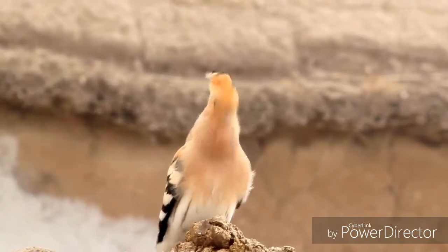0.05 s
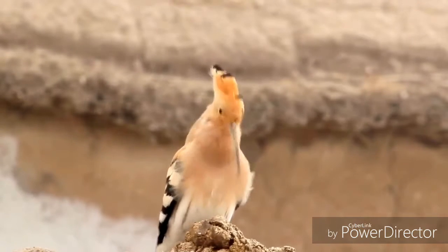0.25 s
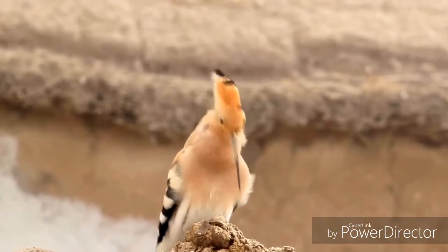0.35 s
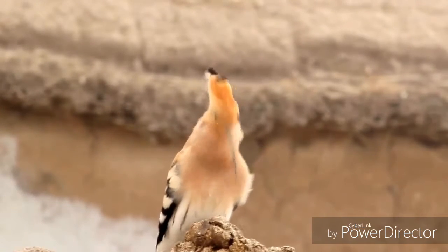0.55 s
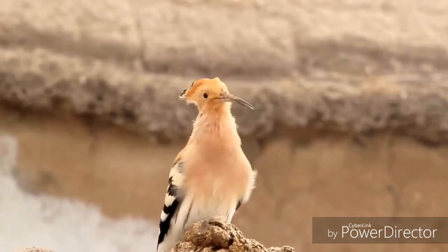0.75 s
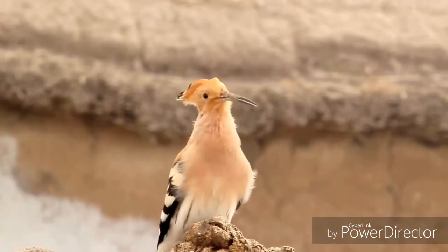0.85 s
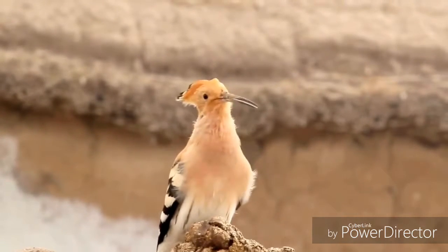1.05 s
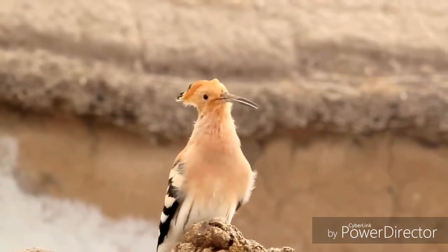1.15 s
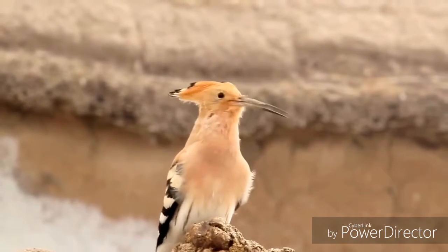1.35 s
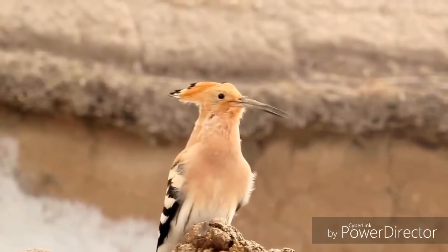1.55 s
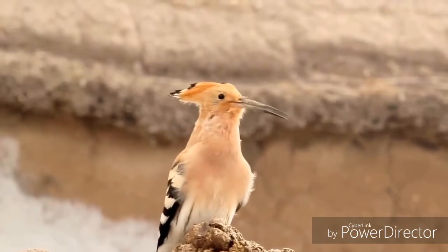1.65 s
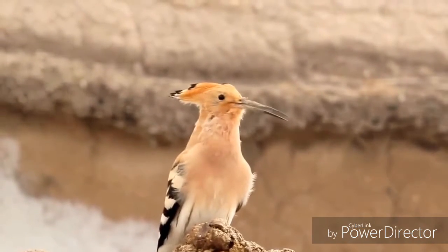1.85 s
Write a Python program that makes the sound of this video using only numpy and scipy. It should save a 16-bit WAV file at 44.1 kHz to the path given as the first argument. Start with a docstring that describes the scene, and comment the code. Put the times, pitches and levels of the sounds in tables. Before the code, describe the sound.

A hoopoe gives three soft, low, evenly spaced hoots, with a brief wooden knock just after the first begins. Nearby sparrows chirp throughout and carry on afterward, over distant twittering and faint outdoor air, with a slight echo off walls.

```python
"""Sparrows chirp over a steady wash of outdoor air, soft puffs of hiss and distant twitter.
A hoopoe on a rock hoots three soft, nearly pure notes from its inflated throat, and nearby
walls throw them back. Something wooden is knocked and rings briefly. Other birds whistle,
call thinly or caw, their voices fluttering into a rasp, and a far one holds a thin note."""
import sys
import numpy as np
from scipy import signal
from scipy.io import wavfile
from scipy.ndimage import uniform_filter1d

SR = 44100
rng = np.random.default_rng(int(sys.argv[2]) if len(sys.argv) > 2 else 0)


def dump(signal):
    """Clip the signal to [-1, 1] and save it as 16-bit WAV at the path in sys.argv[1]."""
    limited = np.clip(np.atleast_2d(signal).T, -1, 1)
    pcm = np.round(limited * 32767).astype(np.int16)
    wavfile.write(sys.argv[1], SR, pcm)


N = 83790

# Slapback of the birds off the walls. Each row: delay in seconds, relative level in dB.
WALL_ECHOES = [(.036, -18.4), (.0573, -24.8), (.0608, -19.3), (.1075, -24.5), (.1172, -29.5),
               (.1574, -28.7), (.2, -32.2), (.2228, -33.5)]


def amp(db):
    return 10 ** (np.asarray(db) / 20)


def unit_rms(x):
    return x / np.sqrt(np.mean(abs(x) ** 2) + 1e-20)


def curve_at(points, hz):
    """Read a curve of (Hz, value) points along a log frequency axis."""
    point_hz, value = np.transpose(points)
    return np.interp(np.log(hz + 1), np.log(point_hz + 1), value)


def add(mix, start_s, sound):
    part = mix[round(start_s * SR):][:len(sound)]
    part += sound[:len(part)]


def drift(n, hz):
    """Complex noise that wanders more slowly than hz, at rms 1."""
    pole, settle = np.exp(-2 * np.pi * hz / SR), 4000
    noise = rng.standard_normal(n + settle) + 1j * rng.standard_normal(n + settle)
    return unit_rms(signal.lfilter([1], [1, -2 * pole, pole * pole], noise)[settle:])


def air_wash():
    """A bed of outdoor noise with soft patches and a wavering hum; the bass slowly ebbs and swells."""
    # Colour of the air. Each row: frequency in Hz, relative level in dB.
    spectrum = [(24, -52), (40, -20.5), (80, -9), (150, 0.5), (280, 2), (520, -1), (1200, -2), (2430, -3),
                (3280, -2), (4210, -6), (4880, -7), (6920, -12.5), (10000, -18.5), (15400, -26)]
    # Low hums. Each row: pitch in Hz, level in dB, waver rate in Hz.
    hums = [(43.4, -83, 5), (89.7, -74.5, 2.1), (146.6, -68, 9)]
    # Fader ride on the bass and the hums. Each row: time in seconds, gain in dB.
    bass_ride = [(0, 2.5), (.45, 3.5), (.9, -6), (1.4, 0), (1.9, -6.5)]
    wash_db, patch_db, bass_hz = -56.5, 1.8, 130
    ride_s, ride_db = np.transpose(bass_ride)
    frames, hz, t = N // 256 + 5, np.fft.rfftfreq(1024, 1 / SR)[:, None], np.arange(N) / SR
    real, imag, patches = rng.standard_normal((frames, 513, 3)).T
    patches = unit_rms(uniform_filter1d(uniform_filter1d(patches, 12, axis=0), 10, axis=1))
    bass_db = np.interp(np.arange(frames) * 256 / SR, ride_s, ride_db) / (1 + (hz / bass_hz) ** 4)
    bands = (real + 1j * imag) * amp(curve_at(spectrum, hz) + patch_db * patches + bass_db)
    air = signal.istft(bands, nperseg=1024, noverlap=768)[1][:N]
    hum = sum(amp(db) * ((1 + .42 * drift(N, waver_hz)) * np.exp(2j * np.pi * pitch * t)).real
              for pitch, db, waver_hz in hums)
    return amp(wash_db) * unit_rms(air) + hum * amp(np.interp(t, ride_s, ride_db))


def hiss_puffs():
    """Short, soft swells of band-limited hiss."""
    # Each row: start and length in seconds, low and high edge in Hz, level at the crest in dB.
    puffs = [(0, 0.045, 1460, 2580, -54), (0.182, 0.061, 5500, 9300, -63), (0.392, .05, 2000, 5200, -54),
             (0.448, 0.044, 2170, 5100, -53.5), (1.704, 0.11, 4840, 7800, -60)]
    out = np.zeros(N)
    for start, length, low_hz, high_hz, db in puffs:
        n = round(length * SR)
        band = signal.butter(2, [low_hz, high_hz], "band", fs=SR, output="sos")
        hiss = unit_rms(signal.sosfilt(band, rng.standard_normal(n)))
        add(out, start, amp(db) * hiss * np.sqrt(np.hanning(n)))
    return out


def wood_knocks():
    """Struck wood rings in fast-dying modes, with no deep bass, and echoes off the walls."""
    # Each row: start in seconds, gain in dB. The first lands just before the scene; its echoes carry in.
    knocks = [(-.045, -24), (0.262, -16), (1.339, -40)]
    # Modes of the wood. Each row: frequency in Hz, relative level in dB, time to fall 60 dB in seconds.
    modes = [(1127, 5.5, 0.0095), (1628, -0.5, 0.011), (836, -9.5, 0.052), (1068, -12, 0.038),
             (1697, -20, 0.055), (1460, -16, 0.049), (450, -16, 0.036), (347, -21, 0.033)]
    # The knocks echo from another side. Each row: delay in seconds, relative level in dB.
    echoes = [(.032, -23), (.038, -22), (.044, -19), (.052, -16), (.061, -22), (.068, -21), (.075, -22),
              (.09, -26)]
    lead_s, attack_s = .1, .0018
    t, out = np.arange(6000) / SR, np.zeros(N + round(lead_s * SR))
    ring = sum(amp(db - 60 * t / t60) * np.sin(2 * np.pi * hz * t) for hz, db, t60 in modes)
    attack = np.sin(np.pi / 2 * np.minimum(t / attack_s, 1)) ** 2
    blow = signal.sosfilt(signal.butter(2, 230, "high", fs=SR, output="sos"), ring * attack)
    for start, db in knocks:
        add(out, start + lead_s, amp(db) * blow)
    return walls(out, echoes, echo_db=0, tail_db=-10.5, rise_s=.032)[-N:]


def bird_voice(contour, harmonics_db, rasp):
    """One call on a pitch and level contour; rasp (0-1) breaks it up into sidebands and hiss."""
    flutter_hz, breakup_hz, hiss_hz, fade_s = 338.5, 117, 470, .003
    times, hz, db = np.transpose(contour)
    t = np.arange(times[0], times[-1], 1 / SR)
    n = len(t)
    phase = 2 * np.pi * np.cumsum(uniform_filter1d(np.interp(t, times, hz), 60)) / SR
    fade = np.clip(np.minimum(t - times[0], times[-1] - t) / fade_s, 0, 1)
    flutter_rate = flutter_hz * (1 + .241 * drift(n, 74).real)
    beat = 2 * np.pi * (np.cumsum(flutter_rate) / SR + rng.random())
    depth = (1 + abs(drift(n, breakup_hz))) / 2
    sidebands = depth * (np.exp(1j * beat) + .81 * np.exp(-1j * beat))
    tone, out = np.zeros(n), np.zeros(N)
    for k, harmonic_db in enumerate(harmonics_db, 1):
        roughness = .3 * drift(n, breakup_hz) + .7 * sidebands + .45 * drift(n, hiss_hz)
        flutter = 1 - rasp / 2 + rasp * roughness
        tone += amp(harmonic_db) * (flutter * np.exp(1j * k * phase)).real
    add(out, times[0], np.sqrt(2) * fade * amp(np.interp(t, times, db)) * tone)
    return out


def thin_calls():
    """High, raspy slivers of song with no overtones."""
    # One contour a call. Each row: time in seconds, pitch in Hz, level in dB.
    calls = [
        [(0.008, 4000, -38), (0.014, 4700, -62), (0.018, 5270, -59), (0.026, 4930, -57), (0.035, 4760, -50)],
        [(0.382, 6400, -65), (0.388, 6360, -54), (0.394, 6460, -58)],
        [(0.424, 6560, -65), (0.429, 6450, -63), (0.435, 6400, -71)],
        [(0.469, 6200, -74), (0.475, 6050, -65), (0.48, 6200, -73)],
        [(0.538, 6100, -68), (0.544, 7000, -61.5), (0.549, 7700, -61)],
        [(0.64, 5000, -50), (0.644, 5120, -80), (0.652, 6070, -62), (0.658, 5800, -61), (0.668, 5640, -77)],
        [(0.738, 6057, -79), (0.744, 5960, -61), (0.766, 5840, -71), (0.775, 5730, -74)],
        [(0.843, 5630, -77), (0.855, 5860, -73), (0.861, 5780, -61), (0.872, 5660, -62)],
        [(1.035, 4000, -76), (1.049, 4150, -76), (1.071, 4040, -74), (1.075, 4000, -70)],
        [(1.112, 6100, -72), (1.12, 6530, -65), (1.128, 7340, -67), (1.136, 7700, -76)],
        [(1.588, 4760, -54), (1.596, 5560, -57), (1.6, 5730, -58.5), (1.606, 7600, -52.5), (1.61, 7600, -89)],
        [(1.652, 5360, -76), (1.67, 8400, -66), (1.688, 8650, -65), (1.7, 8669, -78), (1.708, 8000, -79)],
    ]
    return sum(bird_voice(call, [0], rasp=.6) for call in calls)


def sparrow_chirps():
    """Close sparrows: fast, jagged pitch sweeps with a faint octave on top."""
    # One contour a chirp. Each row: time in seconds, pitch in Hz, level in dB.
    chirps = [
        [(0.024, 3130, -53), (0.034, 3590, -53), (0.04, 3704, -48), (0.046, 3565, -55), (0.051, 3480, -39),
         (0.056, 3680, -63), (0.06, 3550, -37), (0.064, 2916, -55), (0.07, 2974, -58), (0.083, 3646, -41),
         (0.09, 3570, -51), (0.096, 3080, -46), (0.102, 3130, -45), (0.11, 2900, -57), (0.116, 2800, -63),
         (0.12, 2818, -73)],
        [(0.214, 3690, -55), (0.216, 3810, -46.5), (0.224, 4490, -42.5), (0.226, 4750, -40.5),
         (0.232, 4410, -49), (0.24, 3950, -33), (0.244, 3710, -52), (0.25, 3060, -45), (0.252, 4160, -60)],
        [(0.253, 4770, -48), (0.265, 4030, -45), (0.273, 4000, -56), (0.275, 3640, -78)],
        [(0.277, 2670, -43), (0.283, 2940, -44), (0.291, 3167, -45.5), (0.301, 3027, -43.5),
         (0.311, 2876, -44.5), (0.316, 2600, -37), (0.322, 2400, -44)],
        [(0.545, 4180, -74), (0.549, 5050, -56), (0.553, 5907, -47.5), (0.557, 5700, -44), (0.561, 6375, -51),
         (0.567, 5057, -45), (0.571, 4460, -37.5), (0.579, 4645, -39.5), (0.585, 4115, -37), (0.591, 3467, -40),
         (0.596, 2694, -44), (0.5975, 3320, -42), (0.599, 4560, -41), (0.601, 4640, -34), (0.603, 3675, -34),
         (0.605, 2987, -42), (0.609, 3486, -39), (0.622, 3742, -41), (0.629, 3420, -37.5), (0.633, 3093, -32.5),
         (0.639, 2896, -40.5), (0.644, 2830, -41), (0.652, 2650, -42.5), (0.66, 2610, -60), (0.668, 2400, -57)],
        [(0.878, 4030, -72), (0.88, 3760, -66), (0.884, 4740, -63), (0.888, 5630, -51), (0.89, 5770, -47),
         (0.896, 6220, -57), (0.898, 6120, -58), (0.904, 4440, -45.5), (0.906, 4110, -43), (0.912, 4300, -46),
         (0.914, 4440, -47), (0.922, 3415, -47.5), (0.928, 4000, -45), (0.934, 4390, -42.5), (0.936, 4240, -47),
         (0.942, 3665, -41), (0.948, 2932, -53), (0.97, 3120, -45.5), (0.99, 3620, -50.5), (1.006, 2760, -63),
         (1.012, 2870, -66)],
        [(1.13, 2920, -58), (1.134, 3190, -55), (1.14, 4515, -34.5), (1.144, 5100, -40.5), (1.148, 4780, -38),
         (1.162, 4390, -36.5), (1.164, 4160, -42), (1.168, 3070, -42), (1.17, 3430, -43), (1.174, 4190, -31.5),
         (1.176, 4570, -43), (1.182, 4640, -48), (1.184, 4705, -50), (1.192, 3980, -31.5), (1.194, 4040, -30.5),
         (1.198, 4165, -42), (1.2, 4040, -34), (1.202, 3400, -39), (1.204, 2850, -33), (1.21, 3840, -45),
         (1.22, 3330, -38), (1.23, 3246, -47), (1.24, 2740, -53), (1.25, 2740, -62)],
        [(1.32, 4500, -68), (1.322, 4564, -52), (1.33, 5750, -46), (1.337, 6250, -47), (1.34, 6200, -47),
         (1.344, 5420, -48.5), (1.348, 4610, -39), (1.35, 4264, -40), (1.356, 4290, -39.5), (1.358, 4080, -47),
         (1.364, 2300, -57), (1.368, 3620, -45), (1.37, 3780, -38), (1.376, 4344, -47), (1.378, 4460, -38),
         (1.384, 3690, -39), (1.39, 2880, -49), (1.396, 3380, -46), (1.398, 3530, -51), (1.4, 3080, -41.5),
         (1.406, 3370, -49), (1.412, 3080, -60), (1.416, 2890, -47), (1.43, 2570, -57)],
        [(1.6, 3530, -76), (1.604, 3830, -53), (1.61, 4150, -37), (1.624, 4175, -36.5), (1.628, 4750, -34.5),
         (1.63, 4340, -42), (1.634, 3890, -41.5), (1.642, 3223, -44), (1.648, 2984, -51), (1.658, 2325, -53),
         (1.66, 2295, -47), (1.67, 2563, -53), (1.68, 2680, -46), (1.688, 2740, -44), (1.7, 2847, -44),
         (1.71, 3310, -42.5), (1.724, 3745, -53), (1.736, 3085, -54.5), (1.748, 3050, -47.5),
         (1.764, 3660, -57), (1.77, 3990, -54), (1.778, 3027, -50.5), (1.786, 2840, -56), (1.79, 2945, -59)],
    ]
    # Rasp of each chirp, from 0 to 1.
    rasps = [.3, .4, .55, .45, .5, .4, .25, .5, .1]
    return sum(bird_voice(chirp, [0, -28.5], rasp) for chirp, rasp in zip(chirps, rasps))


def distant_twitter():
    """Many small birds far off: a scatter of tiny random glides."""
    count, per_second, low_hz, high_hz, level_db = 150, 76, 2618, 4816, -61
    out = np.zeros(N)
    for when, pitch, glide, length, faintness in rng.random((count, 5)):
        t = np.arange(0, .0329 + .021 * length, 1 / SR)
        hz = (low_hz + pitch * (high_hz - low_hz)) * (1 + .34 * (glide - .6) * t / t[-1])
        peep = np.hanning(len(t)) * np.sin(2 * np.pi * np.cumsum(hz) / SR)
        add(out, when * count / per_second, amp(-8 * faintness) * peep)
    return amp(level_db) * out


def small_bird_whistles():
    """Fainter, short whistles from other birds, some clean and some husky."""
    # One contour a whistle. Each row: time in seconds, pitch in Hz, level in dB.
    whistles = [
        [(0.125, 3040, -79), (0.133, 3120, -72), (0.143, 3150, -84), (0.16, 3120, -95)],
        [(0.472, 3250, -61), (0.485, 3470, -41.5), (0.489, 3600, -64), (0.493, 3750, -48), (0.503, 3792, -60)],
        [(0.505, 4720, -54), (0.513, 4760, -63), (0.519, 4680, -64), (0.531, 4069, -56), (0.552, 3260, -51)],
        [(0.695, 3500, -80), (0.703, 3592, -79), (0.715, 3450, -79), (0.73, 3160, -77)],
        [(0.886, 4130, -63), (0.89, 4160, -60), (0.898, 4420, -57), (0.905, 4416, -50)],
        [(1.015, 3200, -67), (1.023, 3310, -61), (1.033, 3430, -76), (1.039, 3670, -79), (1.043, 3700, -71),
         (1.053, 3648, -69), (1.071, 3333, -82), (1.087, 3100, -67), (1.095, 3020, -77)],
        [(1.112, 3450, -58), (1.12, 3670, -61), (1.13, 4070, -46.5), (1.14, 4170, -62)],
        [(1.226, 1940, -46), (1.234, 2050, -59), (1.244, 2257, -51), (1.248, 2316, -52)],
        [(1.265, 2250, -53), (1.271, 2214, -51.5), (1.297, 1854, -62), (1.31, 2020, -47)],
        [(1.36, 1890, -67), (1.37, 2075, -51), (1.38, 2100, -55)],
        [(1.525, 2720, -73), (1.531, 2925, -71), (1.541, 3040, -52), (1.553, 2950, -63), (1.557, 3000, -73),
         (1.567, 3270, -58), (1.575, 3550, -66)],
        [(1.648, 4320, -86), (1.656, 4510, -42.5), (1.664, 4480, -37.5), (1.67, 4495, -64), (1.69, 4608, -47),
         (1.696, 4960, -45), (1.698, 4663, -38.5), (1.701, 4230, -38)],
        [(1.699, 4450, -30), (1.703, 3857, -43.5), (1.711, 3340, -54), (1.719, 2600, -56), (1.721, 2540, -38),
         (1.729, 2360, -57), (1.732, 2530, -73)],
        [(1.783, 4232, -62), (1.79, 4232, -55), (1.819, 4233, -54), (1.827, 3620, -58), (1.832, 3569, -64)],
        [(1.834, 4233, -60), (1.858, 4232, -55), (1.864, 4150, -64)],
        [(1.866, 3000, -59), (1.878, 3320, -54), (1.886, 3550, -62), (1.892, 3643, -61), (1.9, 3700, -61)],
        [(1.245, 1340, -51), (1.255, 1310, -54.5), (1.264, 1280, -58), (1.272, 1250, -55)],
        [(0.632, 3320, -52), (0.639, 3374, -42), (0.647, 3310, -47.5), (0.655, 3110, -55), (0.664, 3050, -60)],
    ]
    # Rasp of each whistle, from 0 to 1.
    rasps = [.3, .3, .2, .2, .5, .4, .5, .5, .75, .5, .5, .8, .15, .1, .1, .3, .5, .6]
    return sum(bird_voice(whistle, [0, -28.5], rasp) for whistle, rasp in zip(whistles, rasps))


def hoopoe_hoots():
    """Nearly pure tones from the inflated throat: slow swell, quicker close, pitch rising late."""
    # Each row: start and length in seconds, peak level in dB, pitch and rise in Hz, skew of the swell.
    hoots = [(.193, .1095, -28, 575, 40, 1.6), (.402, .105, -27, 587, 25, 1.35),
             (.597, .104, -27, 583.5, 21, 1.4)]
    scoop_hz, scoop_s, close_s = 160, .004, .021  # each note scoops up into its pitch
    overtones_db, brighten_db = [-32.5, -33, -38], 5.5  # harmonics 2-4 grow over the note
    out = np.zeros(N)
    for start, length, peak_db, hz, rise_hz, skew in hoots:
        t = np.arange(0, length, 1 / SR)
        progress = t / length
        pitch = hz + rise_hz * progress ** 1.8 - scoop_hz * np.exp(-t / scoop_s)
        phase = 2 * np.pi * np.cumsum(pitch) / SR
        swell = np.sin(np.pi * progress ** skew) ** .75
        close = np.sin(np.pi / 2 * np.minimum((length - t) / close_s, 1))
        overtones = sum(amp(db + brighten_db * progress) * np.sin(k * phase)
                        for k, db in enumerate(overtones_db, 2))
        add(out, start, np.sqrt(2) * amp(peak_db) * swell * close * (np.sin(phase) + overtones))
    return out


def far_held_note():
    """A far bird's long, thin note, blurred by distance."""
    # Each row: time in seconds, pitch of the second harmonic in Hz, level in dB.
    contour = [(0.52, 1570, -68), (0.6, 1575, -60), (0.66, 1578, -62), (0.7, 1589, -57), (0.76, 1611, -62),
               (0.8, 1580, -59), (0.83, 1590, -58), (0.89, 1570, -61), (0.96, 1562, -68)]
    harmonics_db, blur_hz = [-10, .5, -8], 31
    times, second_hz, level_db = np.transpose(contour)
    t = np.arange(N) / SR
    phase = 2 * np.pi * np.cumsum(np.interp(t, times, second_hz / 2)) / SR
    tone = sum(amp(db) * ((1 + .5 * drift(N, blur_hz)) * np.exp(1j * k * phase)).real
               for k, db in enumerate(harmonics_db, 1))
    return tone * amp(np.interp(t, times, level_db, left=-120, right=-120))


def hoarse_caws():
    """Two rough, nasal calls, strongest on the second harmonic."""
    # One contour a caw. Each row: time in seconds, pitch in Hz, level in dB.
    caws = [
        [(1.308, 1290, -55), (1.32, 1384, -49), (1.33, 1387, -50), (1.342, 1557, -43), (1.349, 1600, -47),
         (1.355, 1550, -56)],
        [(1.44, 1050, -66), (1.452, 1260, -54), (1.46, 1400, -53), (1.468, 1500, -46), (1.476, 1620, -50),
         (1.486, 1600, -53), (1.492, 1510, -57), (1.497, 1330, -66)],
    ]
    return sum(bird_voice(caw, [-7, 0, -11, -22], rasp=.7) for caw in caws)


def walls(sound, echoes, echo_db, tail_db, rise_s):
    """The direct sound, its slapback echoes and a scattered tail whose bands die at their own speed."""
    # Each row: frequency in Hz, time for the tail to fall 60 dB in seconds.
    decay_times = [(300, 0.32), (1200, 0.57), (3500, 0.14), (9000, 0.14)]
    hz, t, bands = signal.stft(rng.standard_normal(SR), SR, nperseg=256)
    decay = amp(-60 * t / curve_at(decay_times, hz)[:, None])
    response = signal.istft(bands * decay, SR, nperseg=256)[1]
    response *= np.clip(np.arange(len(response)) / SR / rise_s, 0, 1)
    response *= amp(tail_db) / np.linalg.norm(response)
    response[0] += 1  # direct path
    for delay, db in echoes:
        response[round(delay * SR)] += amp(db + echo_db)
    return signal.fftconvolve(sound, response)[:len(sound)]


def scene():
    """Near birds, far sounds and the hoopoe, each with its own echo send, over knocks and air in mono."""
    near = sparrow_chirps() + small_bird_whistles()
    far = hiss_puffs() + thin_calls() + distant_twitter() + far_held_note() + hoarse_caws()
    near = walls(near, WALL_ECHOES, echo_db=-13, tail_db=-8.5, rise_s=.0061)
    far = walls(far, WALL_ECHOES, echo_db=-1, tail_db=-9, rise_s=.0031)
    hoopoe = walls(hoopoe_hoots(), WALL_ECHOES, echo_db=0, tail_db=-34, rise_s=.02)
    return (near + far + hoopoe + wood_knocks() + air_wash())[None]


def record(dry):
    """A steep low-pass trims the very top of the treble."""
    lowpass = signal.firwin(511, 15490, window=("kaiser", 9), fs=SR)
    return signal.oaconvolve(dry, lowpass[None], "same")


dry = scene()
out = record(dry)
dump(out)
```